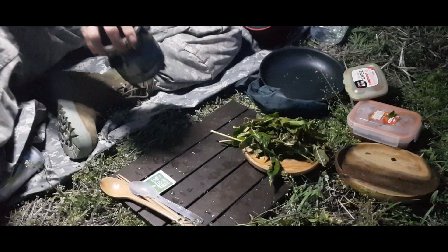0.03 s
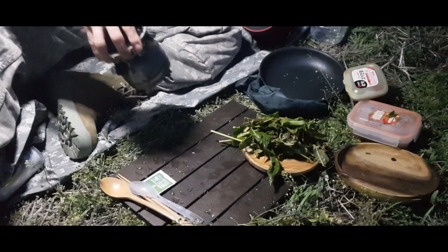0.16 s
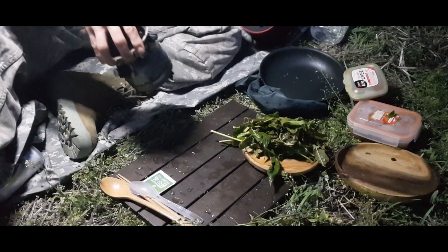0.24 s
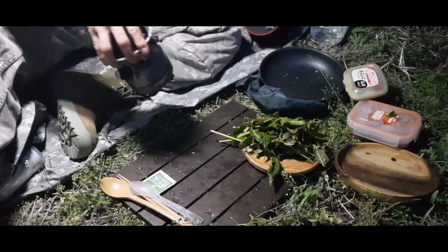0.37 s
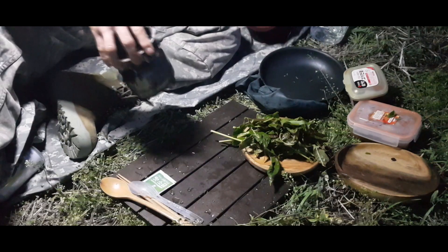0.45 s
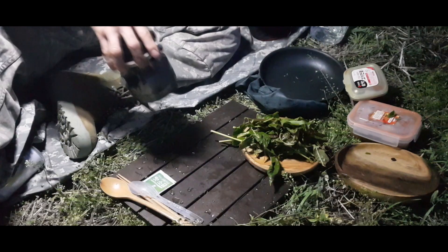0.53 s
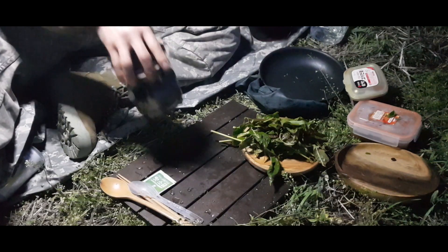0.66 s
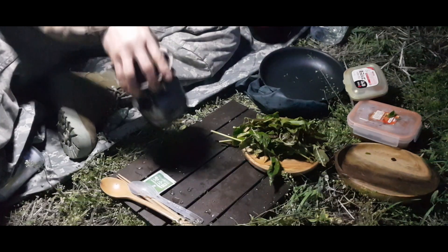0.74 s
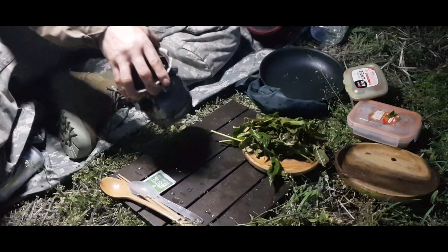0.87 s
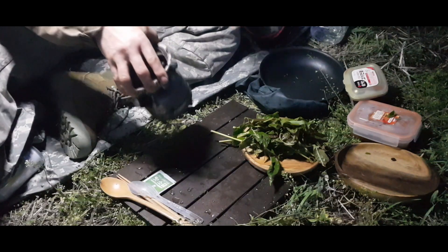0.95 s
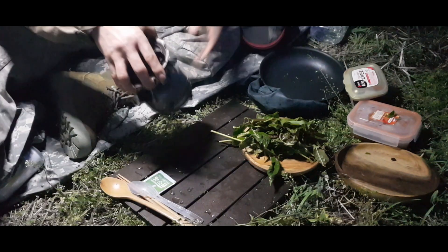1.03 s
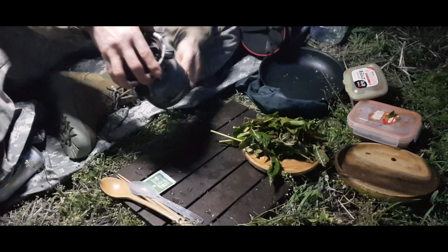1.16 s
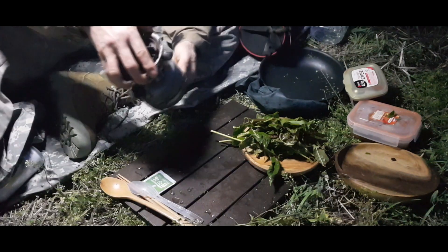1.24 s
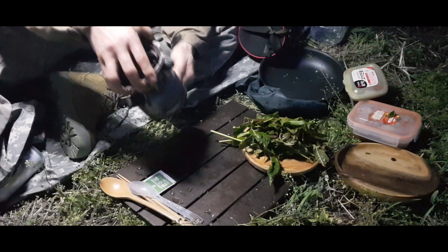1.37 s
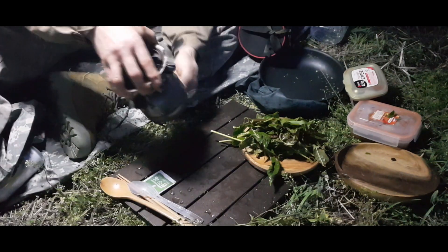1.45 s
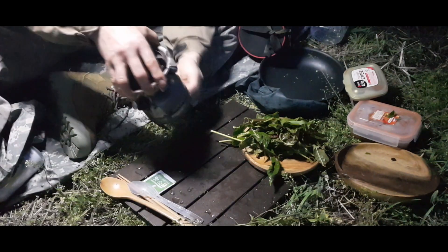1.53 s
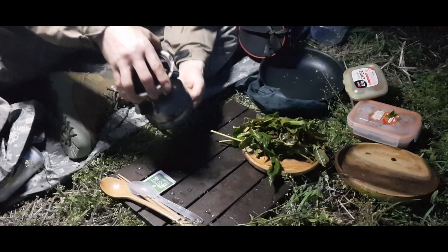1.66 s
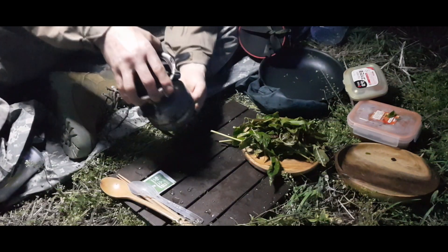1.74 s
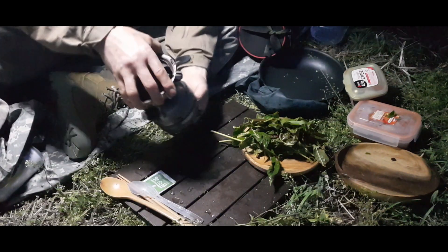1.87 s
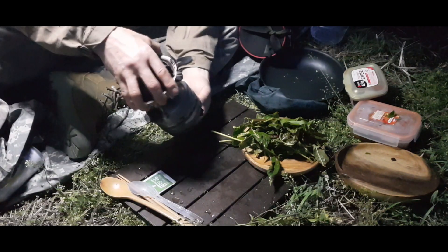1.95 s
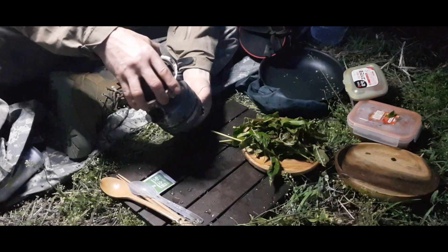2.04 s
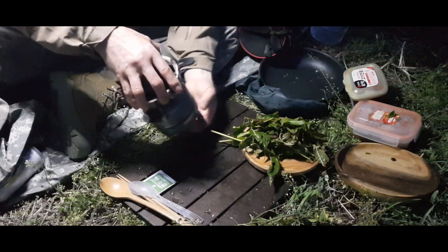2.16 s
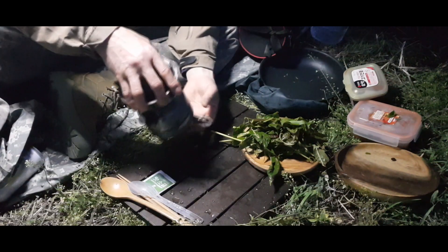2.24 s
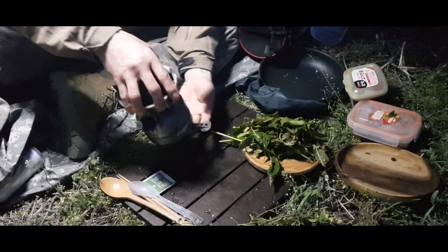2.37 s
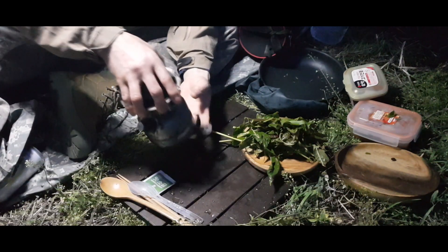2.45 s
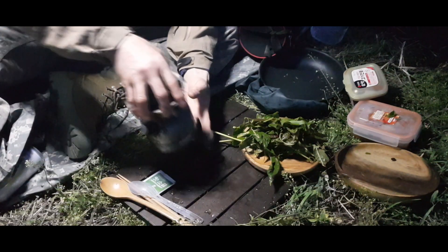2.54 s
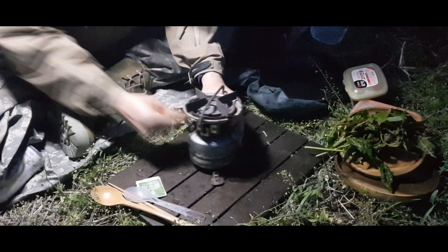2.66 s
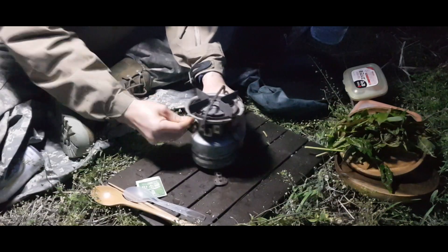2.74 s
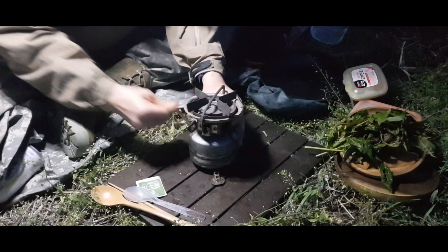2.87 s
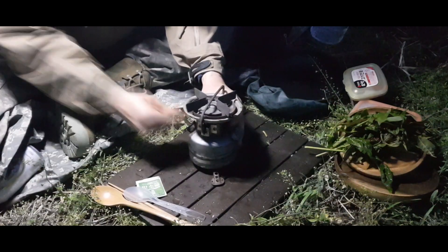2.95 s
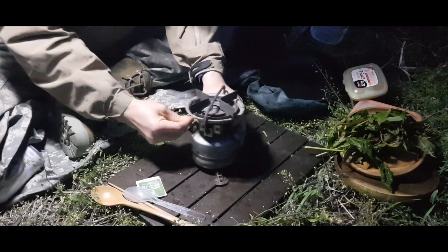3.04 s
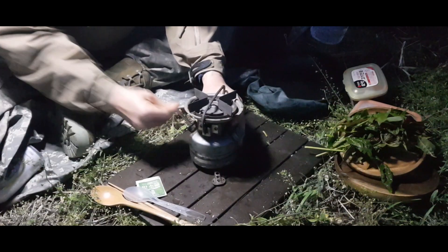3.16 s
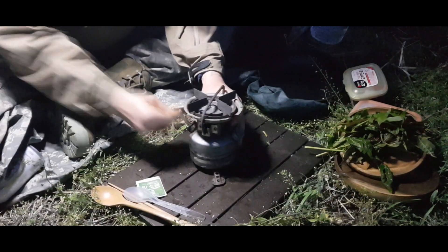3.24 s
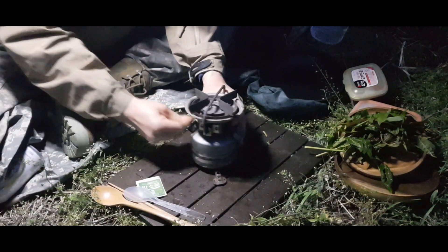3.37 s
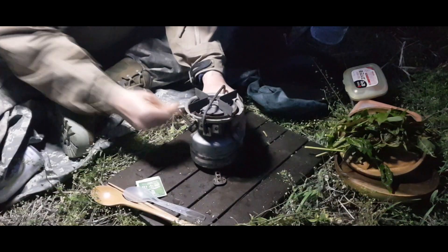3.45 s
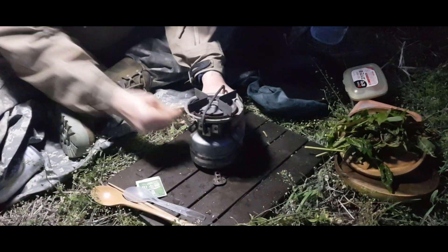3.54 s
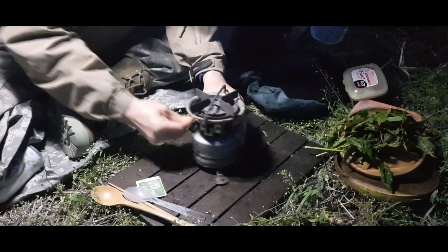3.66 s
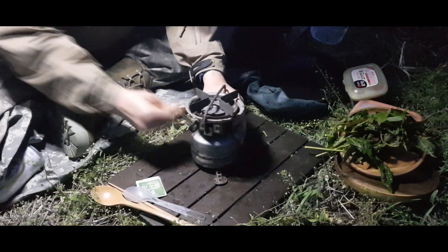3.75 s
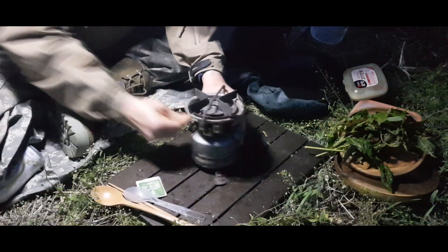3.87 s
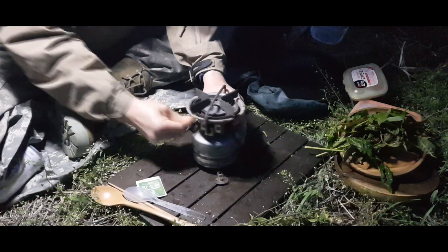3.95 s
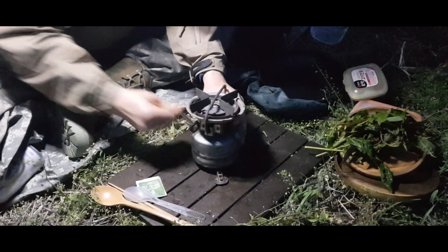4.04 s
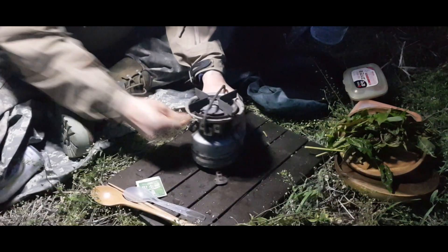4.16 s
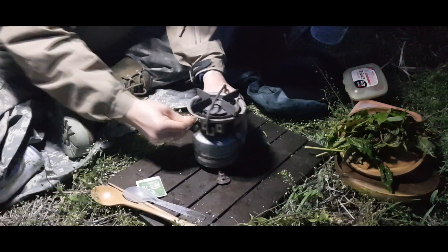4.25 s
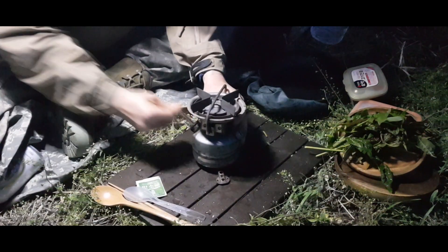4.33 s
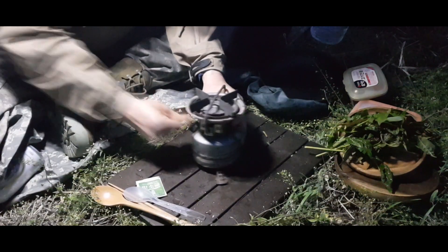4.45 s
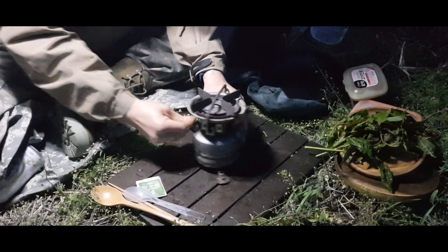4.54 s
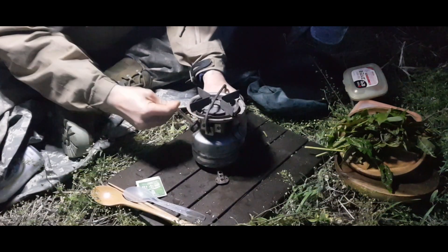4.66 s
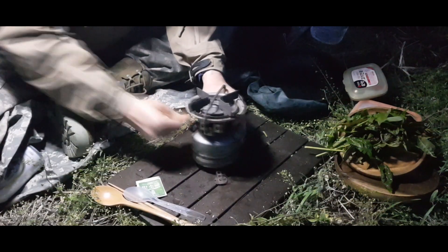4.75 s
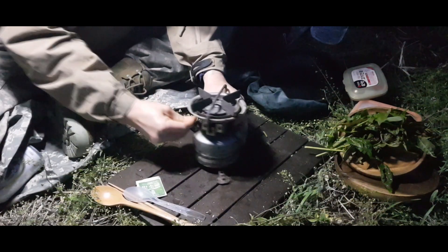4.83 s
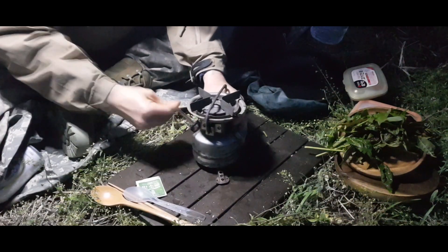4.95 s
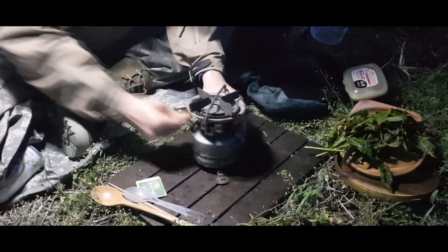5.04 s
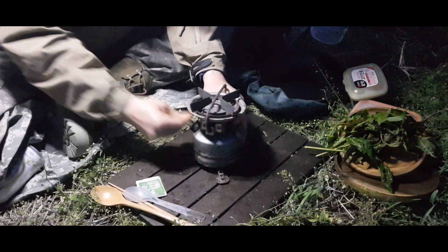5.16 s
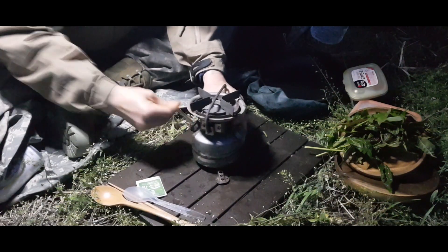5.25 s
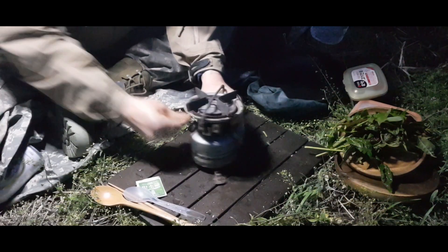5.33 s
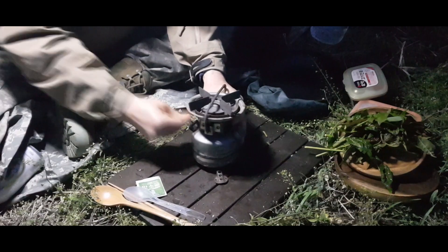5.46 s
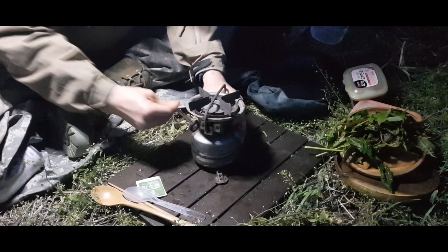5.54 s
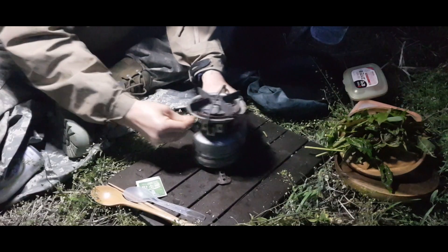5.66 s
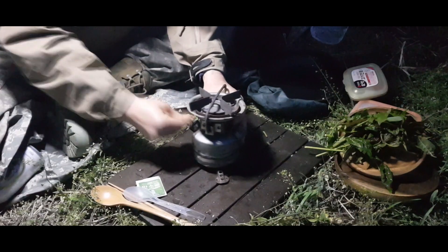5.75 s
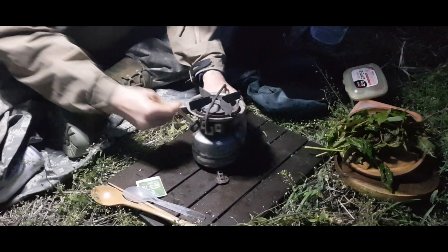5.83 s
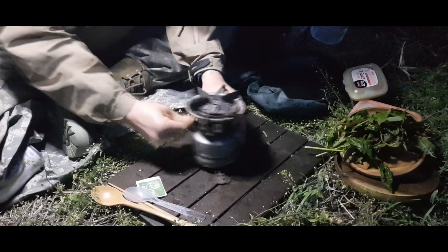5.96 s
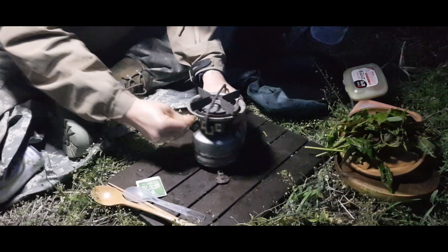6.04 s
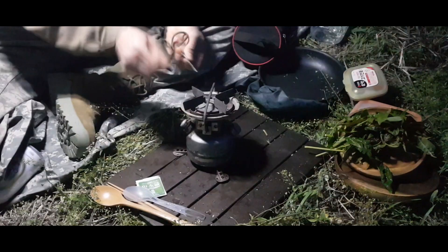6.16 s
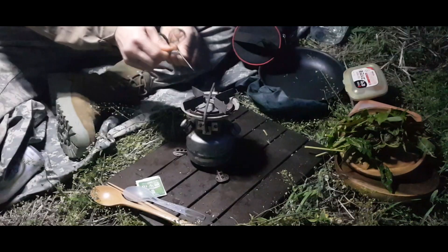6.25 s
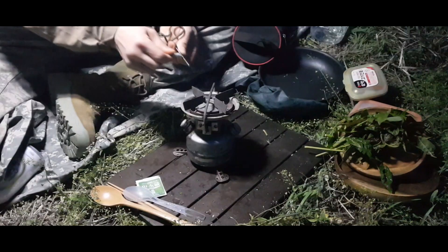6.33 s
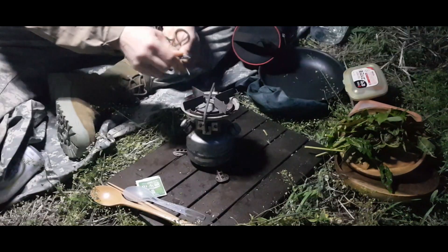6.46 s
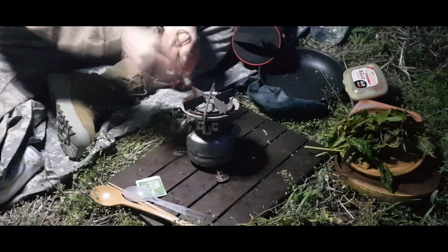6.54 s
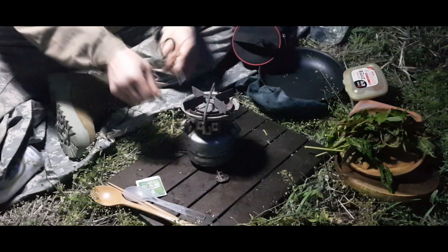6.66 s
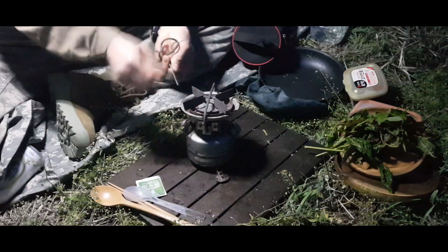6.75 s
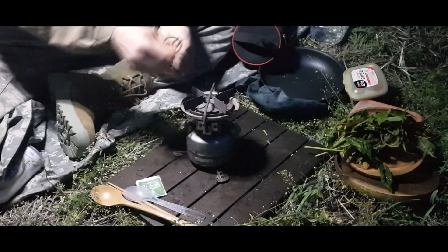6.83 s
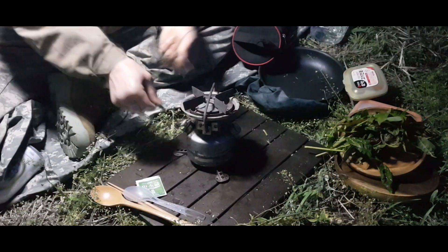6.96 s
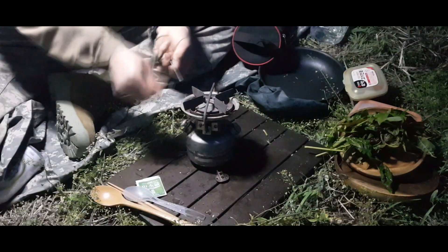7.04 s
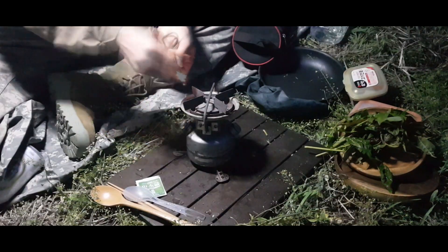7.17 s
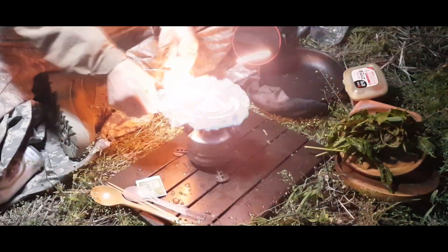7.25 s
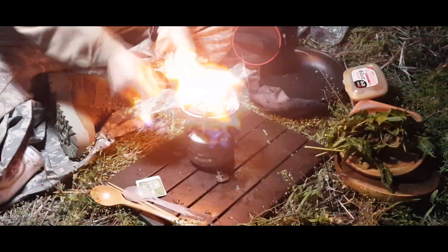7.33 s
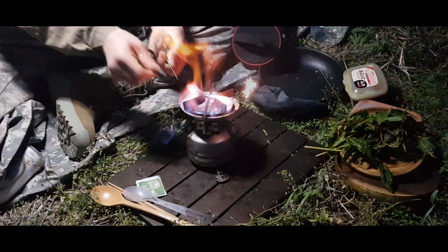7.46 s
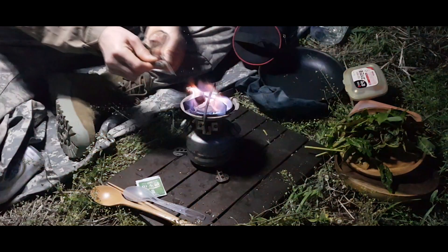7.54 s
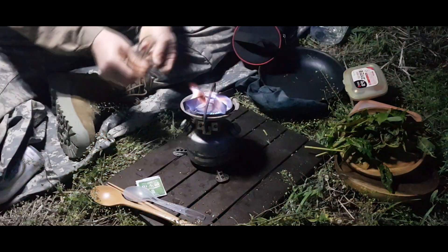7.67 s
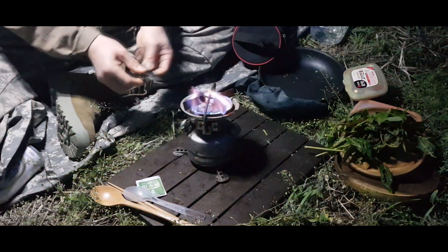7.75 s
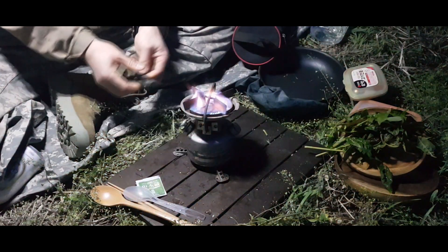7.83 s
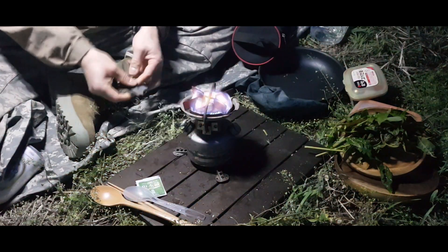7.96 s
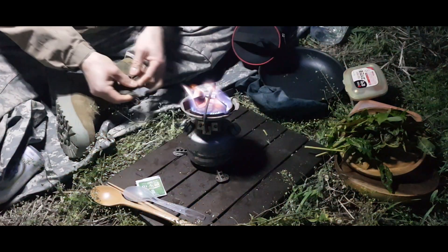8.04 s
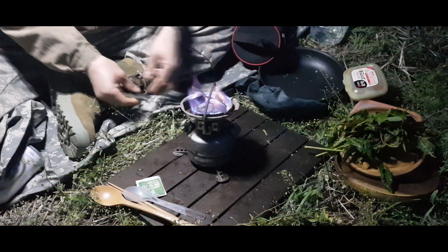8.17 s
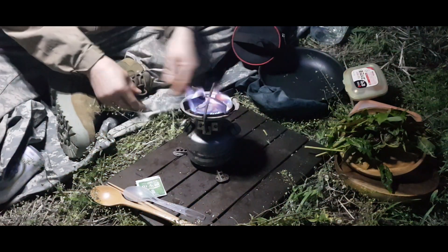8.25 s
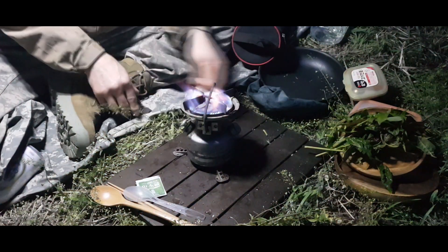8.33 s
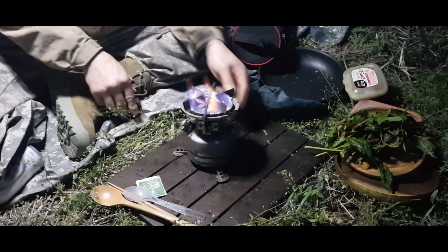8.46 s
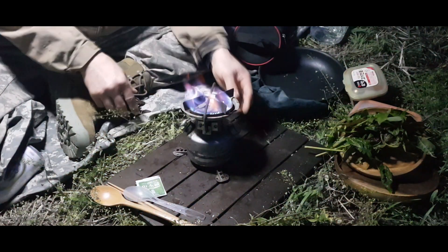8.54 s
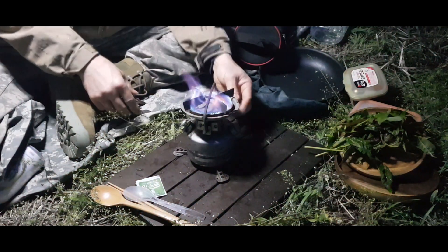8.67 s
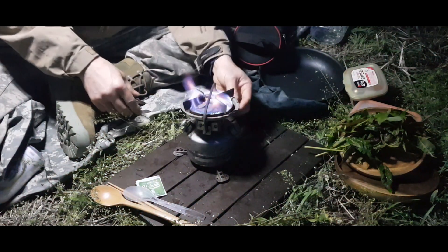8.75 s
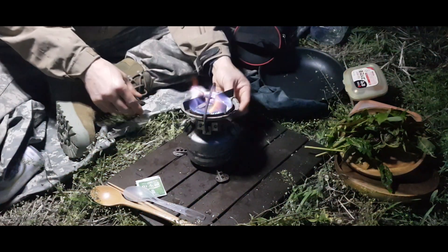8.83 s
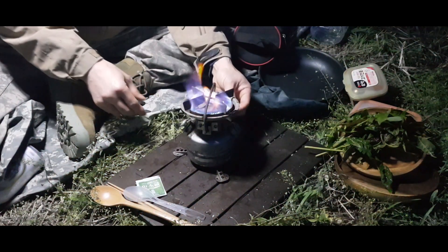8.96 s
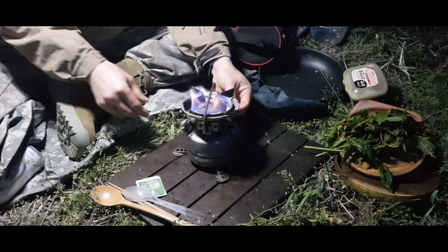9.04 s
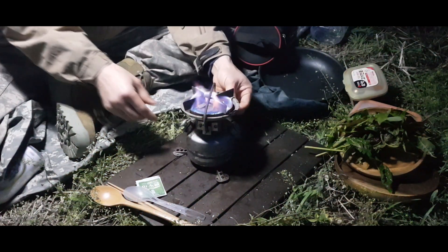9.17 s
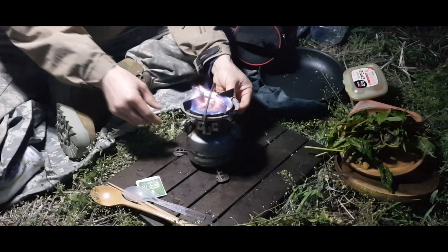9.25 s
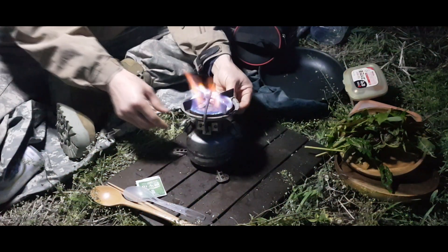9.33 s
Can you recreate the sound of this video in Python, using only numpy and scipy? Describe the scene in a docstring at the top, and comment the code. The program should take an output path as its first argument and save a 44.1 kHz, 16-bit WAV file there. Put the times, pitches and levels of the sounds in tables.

```python
"""Outdoors, a camping stove in three scenes cut together, with a small engine idling some way off.
First the stove is handled: cloth noise, ticks, bumps, gurgles and two knocks on the ringing tank.
Then its metal pump is worked twelve times; each contact rings the rod and thuds into the tank.
Last, gas hisses as the sound fades in, a steel striker is scraped three times and the flame flares up.
Contacts are dying noise with uneven ticks, air and cloth are coloured noise, the engine a row of harmonics."""
import sys
import numpy as np
from scipy import signal
from scipy.fft import rfft, irfft
from scipy.io import wavfile
from scipy.ndimage import uniform_filter1d

SR = 44100
rng = np.random.default_rng(int(sys.argv[2]) if len(sys.argv) > 2 else 0)


def to_wav(s):
    """Save 16-bit WAV."""
    ch = np.atleast_2d(s).T  # columns
    pcm = np.round(np.clip(ch, -1, 1) * 32767)  # PCM
    wavfile.write(sys.argv[1], SR, pcm.astype(np.int16))


N = 414540
T = np.arange(N) / SR
SIZE = 16384  # samples in one contact
HZ = np.fft.rfftfreq(SIZE, 1 / SR)
LEAD = 64 / SR  # s of lead-in ahead of each contact

# The three scenes: start_s, end_s, firings_per_s, firing_s (time of one engine firing)
SCENES = [(0, 2.585, 13.484, .036), (2.585, 6.155, 13.374, 2.622), (6.155, 9.4, 13.292, 7.451)]
FIRST_CUT, SECOND_CUT = SCENES[1][:2]
FADE_POWER = 0.87  # shape of the last scene's fade-in
CUT_FADE_S, CUT_FADE_DB = 0.062, -6  # the second scene sinks just before its cut

# Contacts of the pump rod in its tube: start_s, peak_db, chatter_t60_s, brightness_db_per_octave
STROKES = [(2.703, -21.5, .12, 1.5), (2.71, -15.5, .18, 2.5), (2.7445, -23, .15, -2.5),
           (2.761, -11, .084, 4.5), (2.8564, -22, .09, 7), (2.9916, -25.5, .085, 1.5),
           (3.0135, -36, .067, -18.5), (3.039, -21, .15, 3), (3.0641, -30.5, .12, -3),
           (3.1532, -25.5, .087, 1.5), (3.272, -34, .05, 5), (3.2927, -21.5, .11, 0.7),
           (3.3097, -20, .16, -2.5), (3.358, -21.5, .1, 3.5), (3.3738, -18, .046, 3.5),
           (3.438, -35, .05, -6.5), (3.474, -41.5, .04, -4), (3.5059, -40.5, 0.087, -5),
           (3.5353, -43, 0.067, -5.5), (3.575, -42.5, .08, -6.5), (3.5925, -15.5, .12, 3.5),
           (3.6023, -16.5, .2, 2.5), (3.6287, -19.5, .12, 2.5), (3.6508, -16.5, .074, 6.5),
           (3.7392, -33.5, .11, -1.8), (3.8813, -39, .1, -6), (3.895, -24, .15, -1),
           (3.9188, -16.5, .2, 1.5), (3.949, -17, .1, 5.5), (4.0309, -21, .088, 4.5),
           (4.1, -40.5, 0.066, -9), (4.131, -43, 0.055, -6), (4.1793, -25, .053, 1.5),
           (4.1952, -19.5, .19, 0.5), (4.2267, -18, .16, 4.5), (4.2444, -23, .12, 5.5),
           (4.3224, -31, .086, -3), (4.3334, -25.5, .035, -0.5), (4.4119, -42, .06, -4),
           (4.4725, -16.5, .1, 3.5), (4.491, -15.5, .15, 0), (4.5126, -22, .17, 0), (4.5334, -18, .13, 0.1),
           (4.585, -34.5, .056, -3.5), (4.6242, -26, .054, -1.5), (4.768, -21, .087, 1),
           (4.7792, -16, .14, -1.5), (4.7958, -16, .15, 3), (4.8199, -13, .1, 1.5),
           (4.84, -26.5, .087, 3.5), (4.8895, -35.5, 0.086, 1), (4.9297, -29, .076, -3.5),
           (5.0604, -27.5, .13, 0.7), (5.0815, -28, .12, -1), (5.1049, -29, .11, -2.2),
           (5.1202, -22.5, .13, -1), (5.214, -31.5, .033, -4.5), (5.3496, -15.5, .16, 1.1),
           (5.3662, -16, .15, 0.5), (5.4001, -23.5, .12, -1), (5.4792, -31, .059, -0.5),
           (5.511, -27, .055, -3.5), (5.6341, -32.5, .074, -5), (5.6561, -16.5, .15, 0),
           (5.6855, -22, .2, 1.5), (5.7257, -14, .08, 2.3), (5.8115, -20.5, .075, 4.4),
           (5.9, -37.5, .08, 2), (5.9214, -38, 0.13, -4), (5.9551, -16.5, .15, 3.5), (5.9714, -17, .12, -1),
           (5.9992, -24.5, .16, -4.5), (6.088, -40, .15, -1)]
# Modes of the rod and burner head: pitch_hz, relative_db, t60_s
ROD = [(2250, -15, .1), (3150, -8, .05), (3830, -9, .15), (4240, -10, .14), (4540, -7, .13),
       (5265, -14, .14), (5440, -4, .08), (5560, -6, .1), (6840, -11, .1), (7070, -8, .15), (7150, -6, .1),
       (7670, -10, .12), (8520, -12, .2), (8810, -9, .1), (9090, -8, .1), (9690, -8, .1), (10120, -10, .14),
       (10500, -12, .1), (10950, -3, .11), (11370, -3, .07), (11930, -7, .14), (12350, -9, .09),
       (12550, -12, .14), (12890, -9, .2), (13010, -9, .1), (14000, -13, .07), (14530, -9, .07),
       (14840, -10, .08), (15000, -12, .07)]
# Broad colour of the rod: pitch_hz, relative_db_per_hz
ROD_BODY = [(1120, -14), (1900, -20), (3180, -1.5), (4960, -7), (5380, -5.5), (6210, -7.5), (7180, -3.5),
            (10300, -12.5), (11300, -6.5), (15100, -7), (16500, -30.5)]
# Dull colour of the thud in the tank: pitch_hz, relative_db_per_hz
THUD = [(220, -33.5), (380, -13.5), (414, -39), (475, -1), (749, -12.5), (959, -2), (1280, 2.5),
        (1920, -11.5), (2400, -34), (3120, -35), (5280, -120)]
# Plunger pushed home: start_s, rasp_db, tank_boom_db
PUSHES = [(2.706, -44, -49), (2.99, -48, -49), (3.292, -44.5, -46.5), (3.593, -49.5, -45),
          (3.895, -49, -44), (4.18, -55, -46), (4.473, -44.5, -48), (4.768, -45.5, -47.5), (5.06, -56, -59),
          (5.35, -47.5, -48.5), (5.656, -43.5, -50), (5.955, -51, -47)]
RING_DB, RING_TILT_DB = -42.5, -1  # modes against the rod's broad colour at 8 kHz; slope per octave
THUD_DB, THUD_DULL = -9.5, 0.75  # thud against its strike; dB gained per dB-per-octave of dullness
PAN_SPREAD_DB, GRIT_DB = 1.5, 2.5  # each contact has its own side and uneven colour
PUSH_S, PUSH_FADE_DB_PER_S = 0.096, 302.5
BOOM_S, BOOM_FADE_DB_PER_S = 0.081, 500
DRAW_S, DRAW_END_DB, DRAW_RISE_DB_PER_S = 0.3, -54.5, 14 / 0.15  # plunger drawn back before a push

# Body of the jet's hiss: pitch_hz, relative_db_per_hz
JET = [(180, -17), (300, -5.5), (450, -16), (1180, -14), (1630, -18), (2150, -10), (2600, -3.5),
       (3100, -1.5), (3450, -14), (3900, -17), (5870, -9.5), (6680, -12.5), (9000, -9), (11000, -50)]
# Top of the hiss: pitch_hz, relative_db_per_hz
JET_TOP = [(5000, -47), (8500, -9), (8850, -9), (9970, 1), (10900, -10.5), (11900, -1.5), (14300, 12),
           (15100, 2.5), (15900, -2), (16200, -31)]
JET_DB = -58.5  # body of the hiss before the fade-in and dips
# Top of the hiss before the fade-in and dips: time_s, level_db
TOP_DB = [(6.155, -51), (7.1, -49.5), (8.2, -50.5), (8.45, -46.5), (8.9, -45), (9.1, -49.5), (9.2, -41.5),
          (9.3, -42.5), (9.4, -41.5)]
# The hiss sags and jumps back: jump_s, sag_length_s, depth_db
DIPS = [(8.34, 0.03, -1), (8.746, 0.1, -9), (8.926, .1, -7), (9.015, 0.11, -8)]
DIP_SHARE = 0.75  # of a dip felt by the body of the hiss
# Bites and scrapes of the striker: start_s, peak_db, t60_s, left_over_right_db
SCRAPES = [(6.5638, -42.5, 0.08, -1), (6.576, -39, 0.071, 0), (6.8822, -23.5, 0.056, 1),
           (6.8976, -27.5, 0.065, 1), (7.1875, -22, 0.063, 1.5), (7.21, -27, 0.1, -1),
           (7.2344, -40, 0.24, 1)]
# Colour of the striker: pitch_hz, relative_db_per_hz
STEEL = [(470, -20), (800, -28.5), (1150, -22.5), (2120, -16.5), (2470, -7), (3560, -13), (7340, -6),
         (9100, -8), (12200, 1.5), (15300, -5.5), (16500, -35)]
# Pooled gas catching: time_s, level_db
FLARE_DB = [(7.19, -77), (7.225, -47), (7.26, -39.5), (7.28, -31.5), (7.3, -39), (7.325, -54), (7.36, -57),
            (7.4, -72)]
# Colour of the flare: pitch_hz, relative_db_per_hz
FLARE = [(26, -34), (45, 0.5), (141, 0.5), (466, -27.5), (686, -19), (1410, -36), (3000, -42), (3900, -43),
         (6600, -120)]

# Rustling cloth: pitch_hz, relative_db_per_hz
CLOTH = [(1180, -20), (2000, -4.5), (3230, -5.5), (6300, -5.5), (7420, -0.5), (8960, -8), (14100, -1),
         (15500, -27)]
# Level of the cloth: time_s, level_db
CLOTH_DB = [(0, -56), (.108, -49.5), (.18, -65), (.434, -56), (.7, -71.5), (.95, -70.5), (1.15, -58),
            (1.6, -63), (2.2, -74), (2.585, -62)]
# Low sound of a sleeve: pitch_hz, relative_db_per_hz
SLEEVE = [(88, -21), (150, 1.5), (210, -2), (275, -18), (859, -17.5), (989, -15), (2000, -20), (2600, -53),
          (4400, -120)]
SLEEVE_S, SLEEVE_DB = 8.27, -62.5
SLEEVE_RISE_S, SLEEVE_HOLD_S, SLEEVE_FALL_DB_PER_S = 0.039, 0.2, 110
# Small ticks of the stove: start_s, peak_db, centre_hz, left_over_right_db
TICKS = [(.1, -42, 7300, -17), (.189, -41, 14000, -5), (.3364, -42.5, 6000, -4), (.596, -50, 13000, -2),
         (0.44, -37, 5950, -3), (0.747, -46, 9000, -3), (1.203, -41.5, 2420, -3), (1.338, -53, 11700, 1),
         (1.5426, -39.5, 4030, -4), (1.738, -43.5, 13200, 4), (1.909, -47, 5630, 3),
         (2.0273, -49, 11000, 2), (2.109, -47, 7500, -2), (2.169, -47, 11900, -1), (2.4512, -40, 2100, 2),
         (2.5177, -48, 2050, -5), (7.4495, -44, 13400, .5), (7.846, -45.5, 13500, 7),
         (7.9887, -44, 13900, 4.5)]
# Dull bumps of hands on the stove: start_s, peak_db, centre_hz, left_over_right_db
BUMPS = [(0.353, -39, 450, 1), (.372, -39, 1290, -1), (.401, -32, 385, 1), (.475, -40.5, 705, -3),
         (0.529, -40, 450, -1), (0.756, -43, 950, -1), (1.138, -45, 430, -3), (2.554, -30.5, 1200, 1),
         (8.121, -49, 300, 2)]
TICK_T60, BUMP_T60 = 0.051, 0.082  # s
# Fuel gurgling in the tank: start_s, peak_db, low_hz, high_hz, length_s
GURGLES = [(0.359, -48, 437, 533, 0.049), (.735, -50, 464, 533, 0.054)]
# Knocks on the tank: start_s, peak_db, rattle_t60_s, brightness_db_per_octave
KNOCKS = [(1.2374, -26.5, 0.078, 9), (1.246, -26.5, 0.055, -1)]
# Modes of the tank: pitch_hz, relative_db, t60_s
TANK = [(716, -12, .15), (1310, -4, .12), (2056, -4, .1), (2850, -11, .12), (2960, -10, .14),
        (4840, -16, .1), (5819, -18, .08), (6830, -16, .06)]
# Broad colour of the tank: pitch_hz, relative_db_per_hz
TANK_BODY = [(240, -43.5), (400, -24), (1760, -2.5), (2970, -5), (3210, -6), (13900, -25.5), (15500, -35)]

# Exhaust note, one list a scene: multiple_of_firing_rate, relative_db
EXHAUST = [
    [(1, -27.5), (2, -27.5), (3, -5), (4, -0.5), (5, 0.5), (6, 5), (7, -4.5), (8, -2), (9, -2.5), (10, -7),
     (11, -30), (12, -1.5), (13, 0.5), (14, -10), (15, 3), (16, -12.5), (17, -4.5), (18, -20), (19, -13.5),
     (20, -13), (21, -32), (22, -17), (23, -12.5), (24, -20), (25, -35), (26, -16)],
    [(1, -52), (2, -15), (3, -8), (4, -1), (5, -4), (6, 5.5), (7, 4), (8, -8.5), (9, -8), (10, -8),
     (11, -24), (12, -10), (13, -9), (14, -26), (15, -4), (16, -15.5), (17, -13), (18, -39), (19, -11.5),
     (20, -25), (21, -19), (22, -17.5), (23, -16.5), (24, -15.5), (25, -33.5), (26, -11.5)],
    [(1, -45), (2, -20), (3, -10.5), (4, -6), (5, -15), (6, 4), (7, 1), (8, -7.5), (9, -8), (10, -14),
     (11, -21), (12, -14), (13, -29), (14, -30), (15, -16), (16, -34), (17, -22), (18, -60.5), (19, -34),
     (20, -26)],
]
# Exhaust level in each scene, before the fades: level_db
ENGINE_DB = [-51, -47.5, -50]
# Engine tone in each of the first two scenes, before the fades: pitch_hz, level_db
WHINE = [(473, -73), (345, -76.5)]
# Engine clatter and air: pitch_hz, relative_db_per_hz
CLATTER = [(45, -28), (85, -4), (150, -10), (380, -22.5), (470, -22), (730, -23), (1020, -17.5),
           (1400, -23.5), (1730, -18), (3320, -41), (3930, -37.5), (9340, -49), (12800, -39),
           (14300, -41.5), (15300, -70)]
# Clatter in each of the first two scenes, before the fades: level_db
CLATTER_DB = [-54.5, -57]
# Air around the engine in the last scene: pitch_hz, relative_db_per_hz
RUMBLE = [(24, -36), (40, -12), (70, -8), (97, -1.5), (156, -8), (353, -27.5), (400, -45), (520, -66),
          (880, -120)]
# Level of that air before the fade-in: time_s, level_db
RUMBLE_DB = [(6.155, -58), (9.4, -59)]

# Microphone ports, left over right: pitch_hz, level_db
PORTS = [(60, -2.5), (150, -2), (380, -2), (950, -0.5), (2380, -0.5), (5980, -1), (15000, 4)]
EDGE_HZ = 16800  # band limit


def pump():
    """Each contact rings the rod's modes by its own amounts and thuds into the tank."""
    span = [[FIRST_CUT], [SECOND_CUT]]
    rasp, boom = slide()
    out = rasp * noise(ROD_BODY, span, same=0.44, patchy_db=3.1, flicker_db=2.5, size=256)
    out += (boom + gain_of(-12) * rasp) * noise(THUD, span, same=0.46, patchy_db=3.5, flicker_db=1.5)
    mode_db = RING_DB + RING_TILT_DB * np.log2(np.transpose(ROD)[0] / 8000)
    modes = ringing(ROD) * gain_of(mode_db)[:, None]
    body, thud = gain_of(read(ROD_BODY, HZ)), gain_of(read(THUD, HZ))
    for s, db, t60, tilt_db in STROKES:
        both, left, right = rng.standard_normal((len(ROD), 3)).T
        ring = gain_of(4.5 * both + 3 * np.array([left, right])) @ modes
        grit = gain_of(GRIT_DB * evened(uniform_filter1d(rng.standard_normal(len(HZ)), size=200)))
        tilt = gain_of(tilt_db * np.log2(np.clip(HZ, 2000, 16000) / 6000))
        rod = (body * grit + ring) * tilt
        pan_db = PAN_SPREAD_DB * rng.standard_normal()
        strike = chatter(t60, same=0.51, lumpy_db=2.4, ticks_per_s=500) * rod
        add(out, s - LEAD, sides(pan_db) * peaked(strike, db))
        dull = chatter(1.1 * t60, same=0.59, lumpy_db=1.1, ticks_per_s=200) * thud
        add(out, s - LEAD, peaked(dull, db + THUD_DB - THUD_DULL * tilt_db))
    return out * (T < SECOND_CUT) * fade_in()


def slide():
    """Gains of the plunger's rasp (a growing draw, then a push) and of the tank's boom under each push."""
    rasp, boom = np.zeros((2, N))
    for s, db, boom_db in PUSHES:
        drawing = (T < s) * (T > s - DRAW_S)
        rasp += gain_of(DRAW_END_DB + DRAW_RISE_DB_PER_S * (T - s)) * drawing
        rasp += gain_of(db) * swell(s, 0.0045, PUSH_S, PUSH_FADE_DB_PER_S)
        boom += gain_of(boom_db) * swell(s, 0.03, BOOM_S, BOOM_FADE_DB_PER_S)
    return rasp, boom


def burner():
    """The jet's broad and sagging hiss, the striker's steel scrapes and the low burst of the flare."""
    dip_db = sum(db * np.clip(1 + (T - s) / sag, 0, 1) * (T < s) for s, sag, db in DIPS)
    body = noise(JET, TOP_DB, same=0.32, patchy_db=1.8, flicker_db=1.3)
    top = noise(JET_TOP, TOP_DB, same=0.76, patchy_db=2.6, flicker_db=1.5)
    hiss = gain_of(JET_DB + DIP_SHARE * dip_db) * body + curve(TOP_DB) * gain_of(dip_db) * top
    flare = curve(FLARE_DB) * noise(FLARE, FLARE_DB, same=0.7, patchy_db=0.25, flicker_db=0.78, size=1024)
    out = hiss * fade_in() + flare
    steel = gain_of(read(STEEL, HZ))
    for s, db, t60, pan_db in SCRAPES:
        scrape = chatter(t60, same=0.2, lumpy_db=2.4, ticks_per_s=100) * steel
        add(out, s - LEAD, sides(pan_db) * peaked(scrape, db))
    return out


def handling():
    """Cloth noise, resonant ticks and bumps, rising gurgles and tank knocks as the stove is moved about."""
    out = curve(CLOTH_DB) * noise(CLOTH, CLOTH_DB, same=0.13, patchy_db=2.5, flicker_db=2.15)
    span = [[SLEEVE_S - 0.1], [SLEEVE_S + 0.36]]
    sleeve = noise(SLEEVE, span, same=0.26, patchy_db=3.4, flicker_db=2.9, size=1024)
    brush = swell(SLEEVE_S, SLEEVE_RISE_S, SLEEVE_HOLD_S, SLEEVE_FALL_DB_PER_S)
    out += gain_of(SLEEVE_DB) * brush * sleeve
    for touches, t60 in [(TICKS, TICK_T60), (BUMPS, BUMP_T60)]:
        for s, db, hz, pan_db in touches:
            colour = 1 / (1 + ((HZ - hz) / (0.57 * hz)) ** 2) * (HZ < 15500)
            touch = chatter(t60, same=0.35, lumpy_db=2.1, ticks_per_s=150) * colour
            add(out, s - LEAD, sides(pan_db) * peaked(touch, db))
    for s, db, low_hz, high_hz, length in GURGLES:
        hz = np.linspace(low_hz, high_hz, round(length * SR))  # a bubble rises in pitch
        bubble = np.sin(2 * np.pi * np.cumsum(hz) / SR) * np.sqrt(np.hanning(len(hz)))
        add(out, s, gain_of(db) * bubble)
    tank = gain_of(-34.5) * ringing(TANK).sum(0) + gain_of(read(TANK_BODY, HZ))
    for s, db, t60, tilt_db in KNOCKS:
        tilt = gain_of(tilt_db * np.log2(np.clip(HZ, 400, 9000) / 2000))
        knock = chatter(t60, same=0.12, lumpy_db=1.2, ticks_per_s=150) * tank * tilt
        add(out, s - LEAD, peaked(knock, db))
    return out


def engine():
    """Some way off: exhaust note, steady tone, clatter, and in the last scene low air."""
    air = noise(RUMBLE, RUMBLE_DB, same=0.21, patchy_db=0.99, flicker_db=0.69, size=2048)
    span = [[0], [SECOND_CUT]]
    clatter = noise(CLATTER, span, same=0.54, patchy_db=1.95, flicker_db=0.97, size=2048)
    clatter *= gain_of(np.where(T < FIRST_CUT, *CLATTER_DB))
    return (exhaust() + whine() + curve(RUMBLE_DB) * air + clatter) * fade_in()


def exhaust():
    """One firing a cycle; overtones away from the pipe's own note arrive later in the cycle."""
    out = np.zeros(N)
    for (start, end, rate, firing), db, orders in zip(SCENES, ENGINE_DB, EXHAUST):
        k, level_db = np.transpose(orders)
        late = np.cumsum(np.maximum(0.055 * (k - 5.5), 0.1 * (5.5 - k)))  # phase lag, cycles
        inside = (T >= start) & (T < end)
        wander = evened(uniform_filter1d(rng.standard_normal(inside.sum()), size=9000))
        strength = evened(uniform_filter1d(rng.standard_normal(inside.sum()), size=3000))
        turns = (T[inside] - firing) * rate + 0.0015 * wander
        note = gain_of(level_db) @ np.cos(2 * np.pi * (k[:, None] * turns - late[:, None]))
        out[inside] = gain_of(db + 0.27 * strength) * evened(note)
    return out


def whine():
    """A sine with slightly wavering phase in each of the first two scenes."""
    out = np.zeros(N)
    for (start, end, *_), (hz, db) in zip(SCENES, WHINE):
        waver = evened(uniform_filter1d(rng.standard_normal(N), size=4000))
        tone = np.sqrt(2) * np.sin(2 * np.pi * hz * T + 0.5 * waver)
        out += gain_of(db) * tone * (T >= start) * (T < end)
    return out


def fade_in():
    """Gain that sinks at the end of the second scene and rises from silence through the last one."""
    start, end = SCENES[2][:2]
    away = gain_of(CUT_FADE_DB * np.clip(1 + (T - start) / CUT_FADE_S, 0, 1))
    return np.where(T < start, away, np.clip((T - start) / (end - start), 0, 1) ** FADE_POWER)


def chatter(t60, same, lumpy_db, ticks_per_s):
    """Spectrum of a sharp first contact, then uneven ticks and rasp that die away."""
    t, same = np.arange(SIZE) / SR, alike(same, HZ)
    a, b, lumps = rng.standard_normal((3, SIZE))
    ticks = rng.random(SIZE) < ticks_per_s / SR
    big = np.minimum(rng.exponential(1, SIZE), 2.5)
    slips = signal.lfilter([1], [1, -0.9], ticks * gain_of(6 + 2 * big))
    lumps = evened(uniform_filter1d(lumps, size=120)) * np.clip(t / 0.0038, 0, 1)
    dying = gain_of(-60 * t / max(t60, 0.004) + lumpy_db * lumps)
    shape = (1 + slips + 1.4 * np.exp(-t / 0.00043)) * dying
    left, other = rfft(a * shape), rfft(b * shape)
    return np.array([left, same * left + np.sqrt(1 - same ** 2) * other])


def ringing(modes):
    """Spectra of dying sines, one row a mode."""
    hz, db, t60 = np.transpose(modes)[:, :, None]
    t = np.arange(SIZE) / SR
    return rfft(gain_of(db - 60 * t / np.clip(t60, 0.01, 0.3)) * np.sin(2 * np.pi * hz * t))


def peaked(spectrum, db):
    """Back to sound, with a small lead-in; its loudest few milliseconds peak near the given level."""
    x = np.roll(irfft(spectrum), 64, axis=1)
    power = uniform_filter1d((x ** 2).mean(0), size=200).max()
    return gain_of(db) * x / np.sqrt(9 * power)  # peaks taken as three times the rms


def noise(colour, span, same, patchy_db, flicker_db, size=512):
    """Random short-time spectra with patches and flicker, from the first to the last time in span."""
    a, b = round(span[0][0] * SR), min(round(span[-1][0] * SR) + 1, N)
    hop = size // 4
    frames, hz = (b - a) // hop + 5, np.fft.rfftfreq(size, 1 / SR)
    p, q, r, s, patches = rng.standard_normal((frames, len(hz), 5)).T
    patches = uniform_filter1d(uniform_filter1d(patches, size=7, axis=0), size=12, axis=1)
    flicker = evened(uniform_filter1d(rng.standard_normal(frames), size=3))
    same = alike(same, hz)[:, None]
    left, other = p + 1j * q, r + 1j * s
    z = np.array([left, same * left + np.sqrt(1 - same ** 2) * other])
    z *= gain_of(read(colour, hz)[:, None] + patchy_db * evened(patches) + flicker_db * flicker)
    out = np.zeros((2, N))
    out[:, a:b] = evened(signal.istft(z, nperseg=size, noverlap=size - hop)[1][:, :b - a])
    return out


def alike(same, hz):
    """Left-right likeness: the bass is nearly the same at both ports."""
    same = np.clip(same, 0, 1)
    return same + (1 - same) / (1 + (hz / 700) ** 2)


def swell(start, rise, hold, fall_db_per_s):
    """Gain that rises until start, holds, then falls."""
    fall = gain_of(-fall_db_per_s * np.maximum(T - start - hold, 0))
    return np.clip(1 + (T - start) / rise, 0, 1) ** 2 * fall


def curve(rows):
    """A level curve as gain, silent outside its span."""
    s, db = np.transpose(rows)
    return gain_of(np.interp(T, s, db)) * (T >= s[0]) * (T < s[-1])


def read(points, hz):
    """Reads a spectrum in dB on a log-frequency axis."""
    f, value = np.transpose(points)
    return np.interp(np.log(hz + 1), np.log(f + 1), value, left=-90, right=-90)


def gain_of(db):
    """Decibels to gain."""
    return 10 ** (np.asarray(db) / 20)


def evened(x):
    """Scales to rms 1."""
    return x / np.sqrt(np.mean(x ** 2) + 1e-20)


def sides(pan_db):
    """Left and right gain."""
    return gain_of([[pan_db / 2], [-pan_db / 2]])


def add(mix, s, sound):
    """Mixes a sound in at a time in seconds."""
    part = mix[:, round(s * SR):][:, :sound.shape[-1]]
    part += sound[..., :part.shape[1]]


def scene():
    """All sources, from the pump to the engine."""
    return pump() + burner() + handling() + engine()


def record(dry):
    """Two close ports: the right lags more and more towards the treble; then the band limit."""
    hz = np.fft.rfftfreq(N, 1 / SR)
    f, lean_db = np.transpose(PORTS)
    lean_db = np.interp(np.log(hz + 1), np.log(f), lean_db)
    lag = np.exp(-1j * np.pi * (hz / 8300) ** 2.2)
    ports = rfft(dry) * gain_of([lean_db / 2, -lean_db / 2])
    ports[1] *= lag
    band = signal.firwin(511, EDGE_HZ, window=("kaiser", 9), fs=SR)
    return signal.oaconvolve(irfft(ports, N), band[None], "same")


dry = scene()
out = record(dry)
to_wav(out)
```